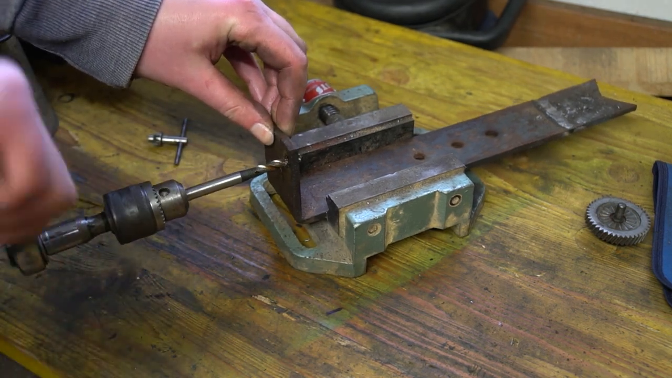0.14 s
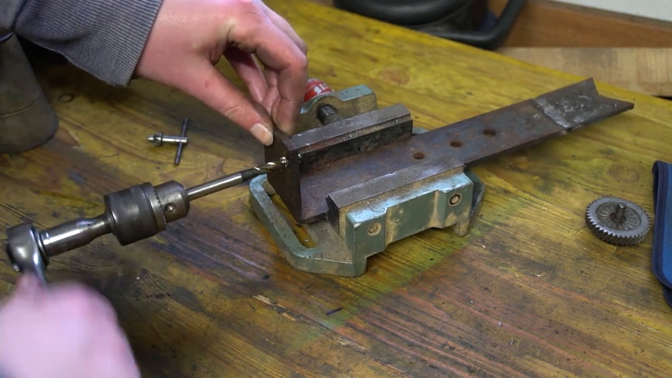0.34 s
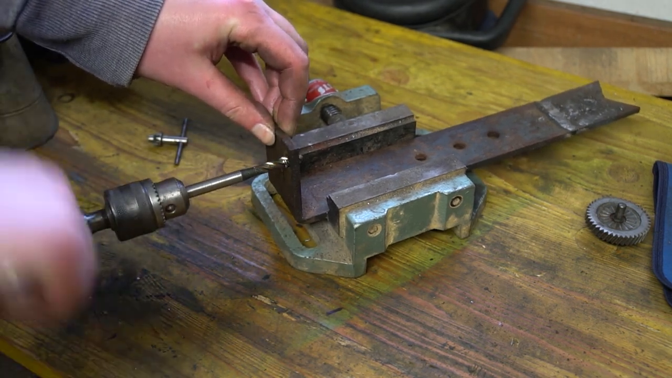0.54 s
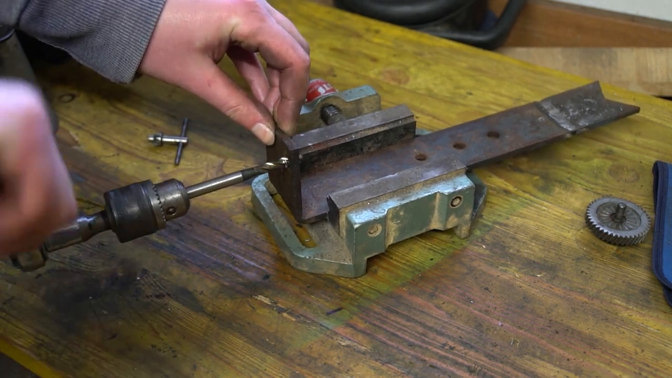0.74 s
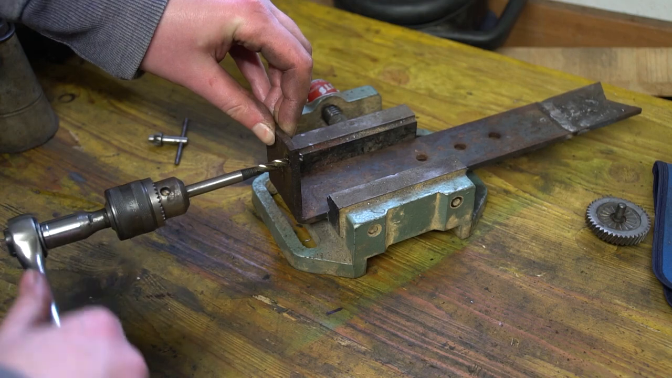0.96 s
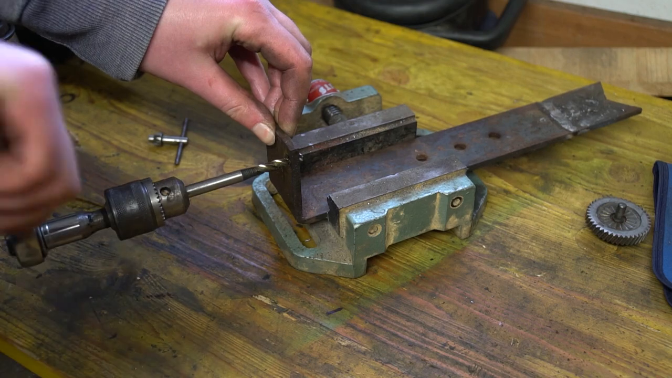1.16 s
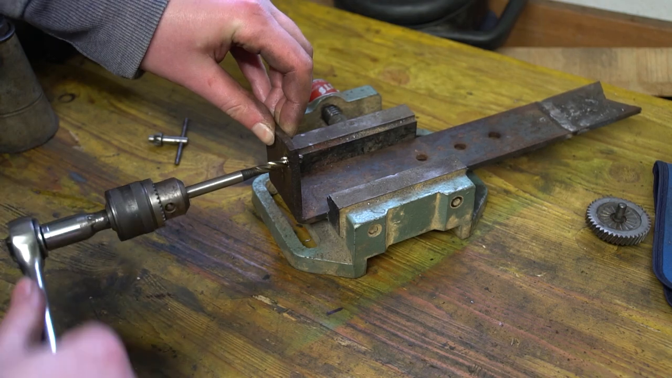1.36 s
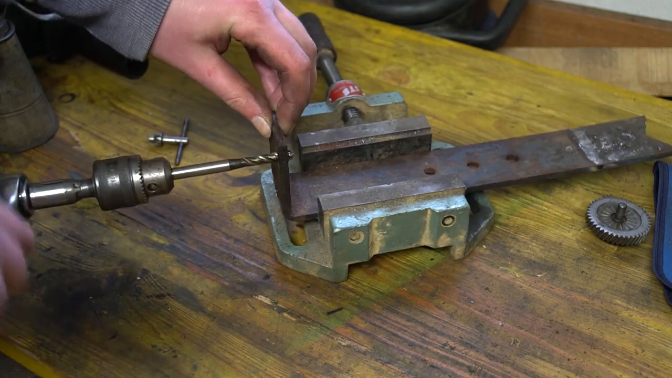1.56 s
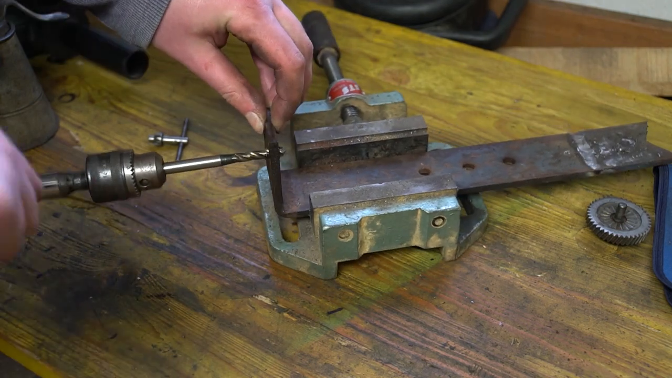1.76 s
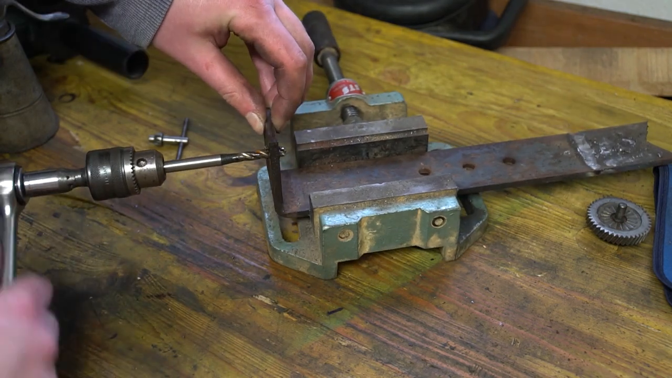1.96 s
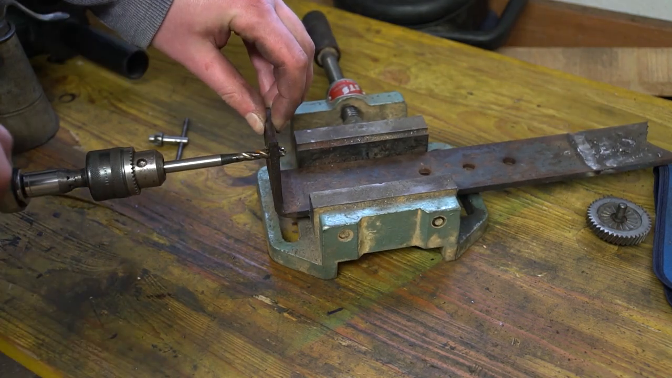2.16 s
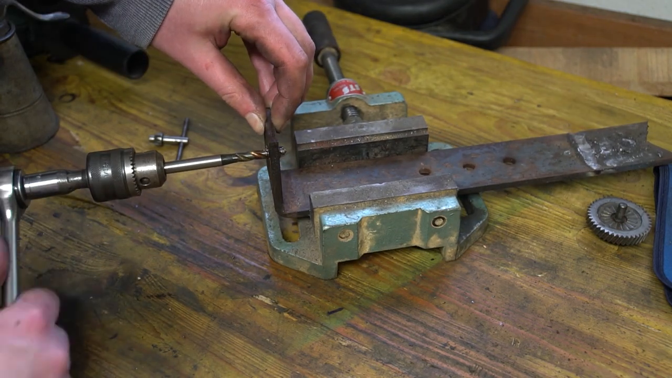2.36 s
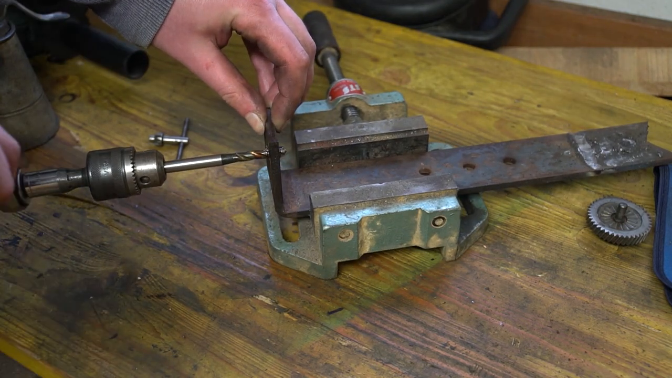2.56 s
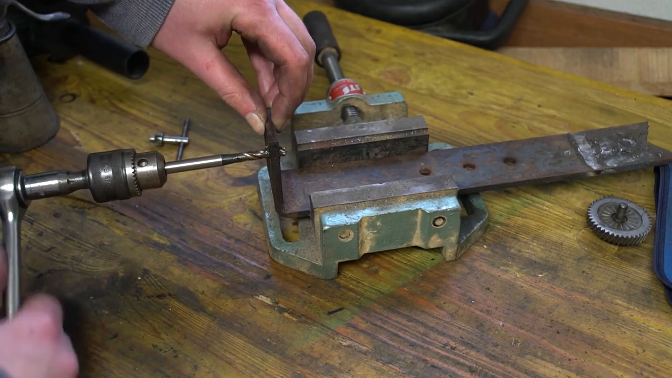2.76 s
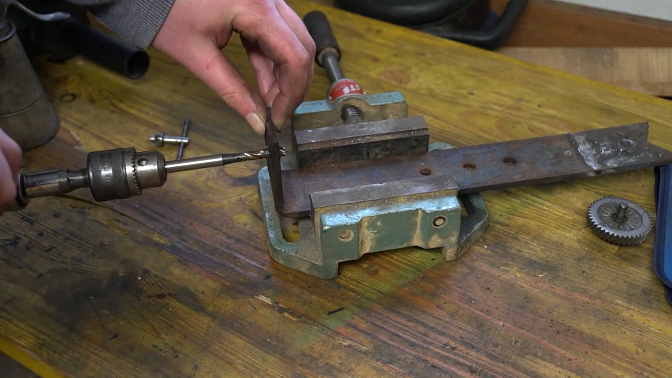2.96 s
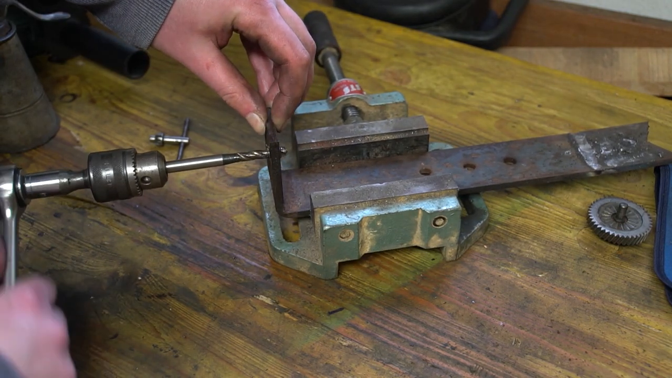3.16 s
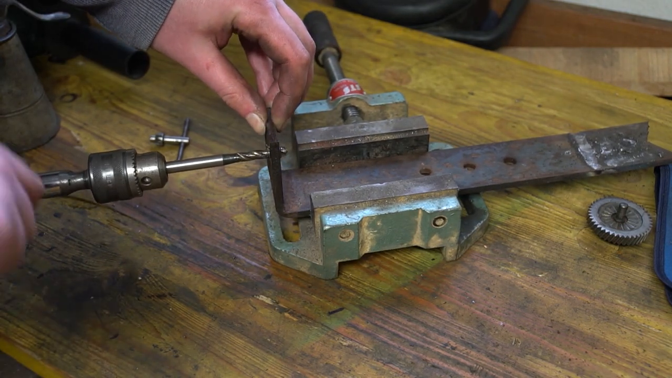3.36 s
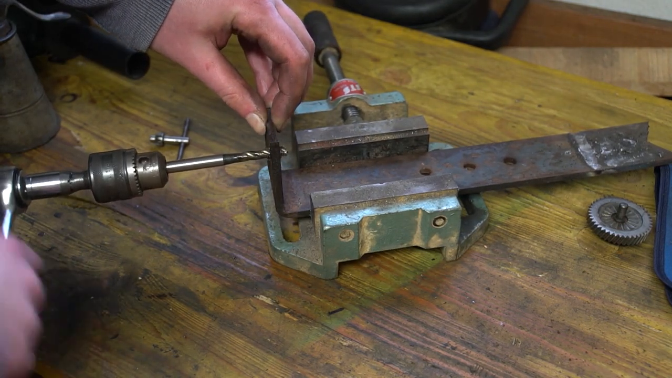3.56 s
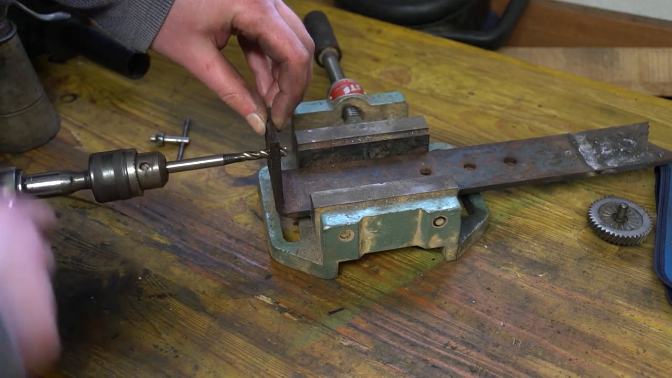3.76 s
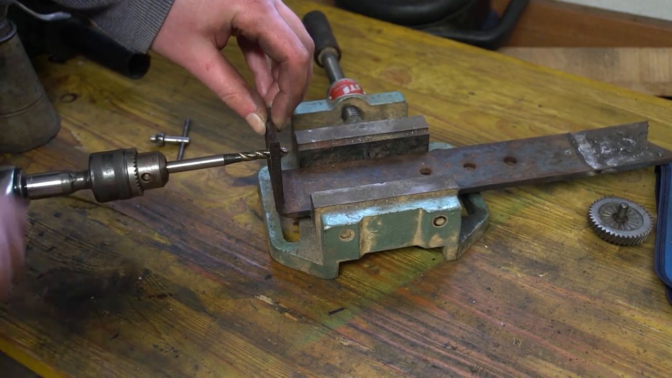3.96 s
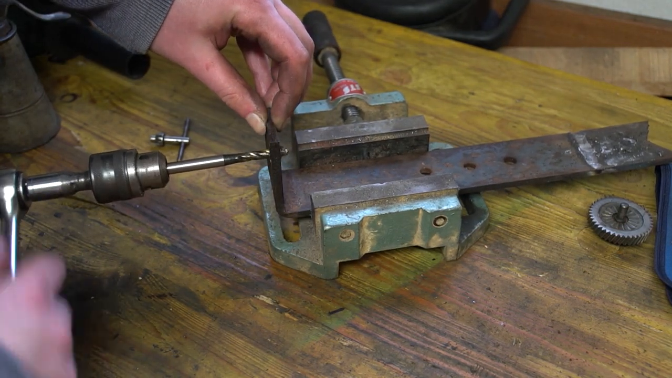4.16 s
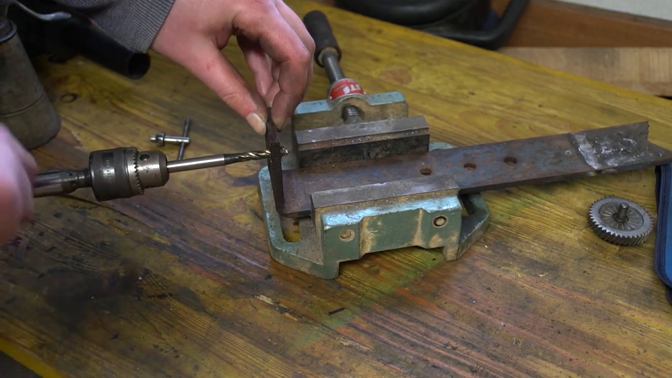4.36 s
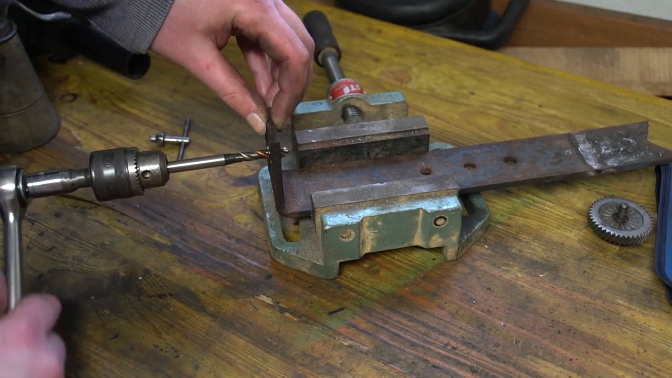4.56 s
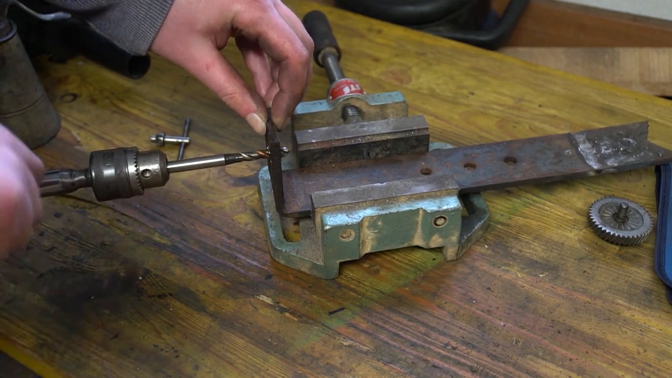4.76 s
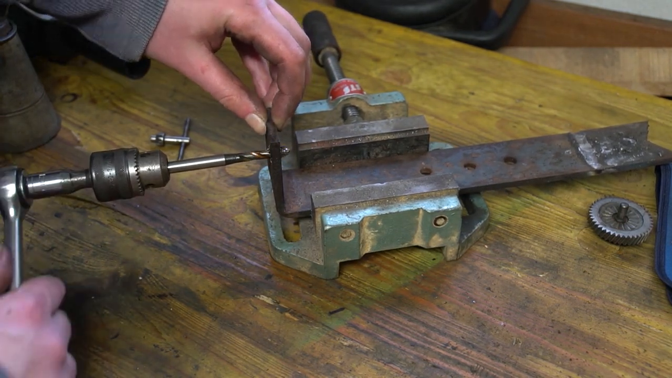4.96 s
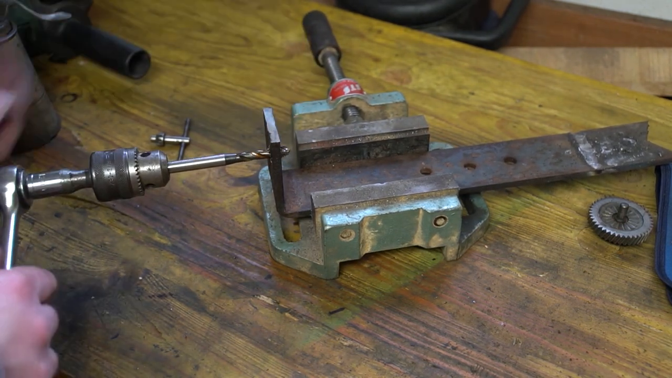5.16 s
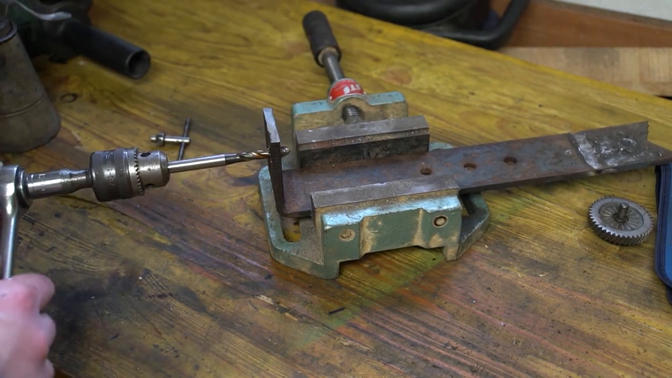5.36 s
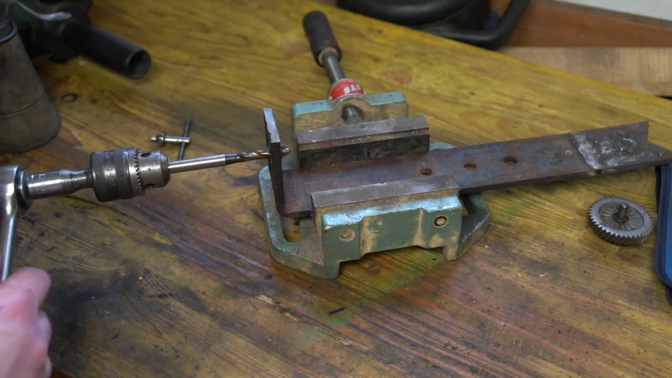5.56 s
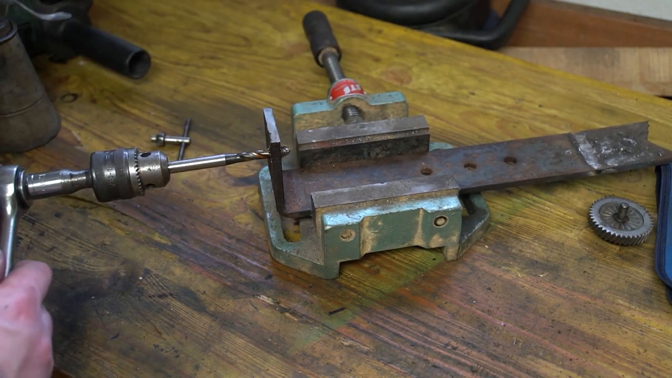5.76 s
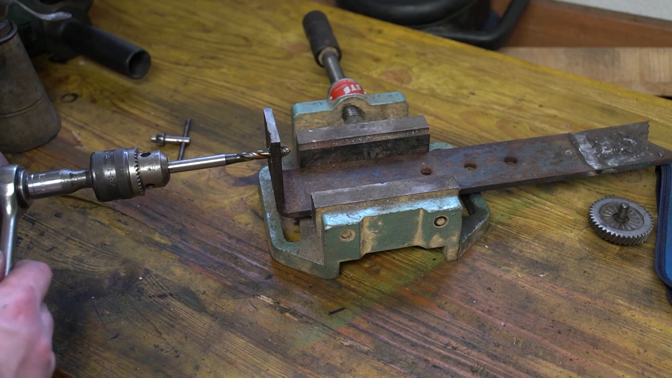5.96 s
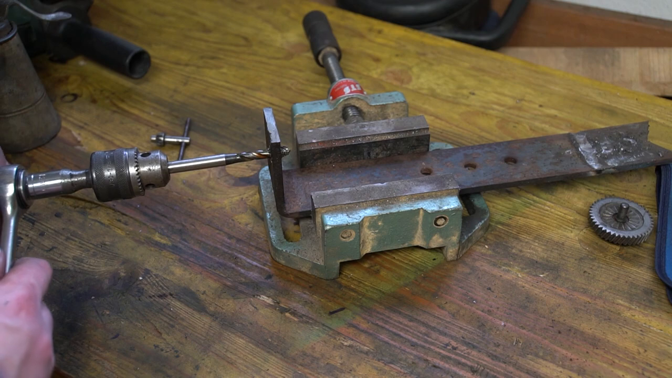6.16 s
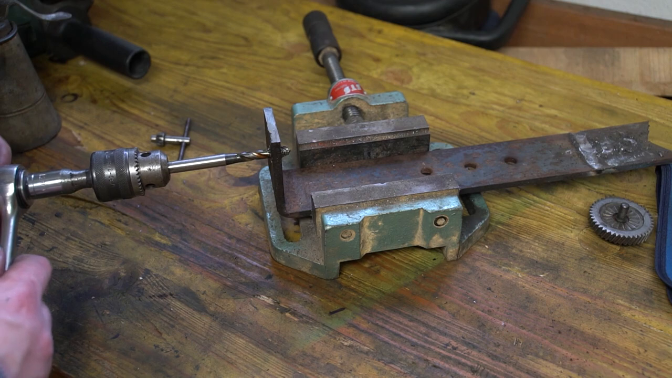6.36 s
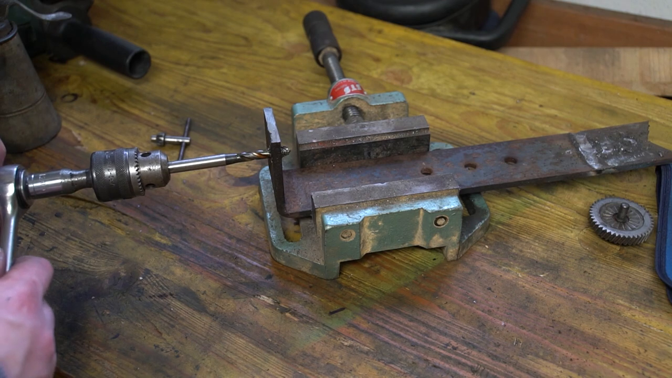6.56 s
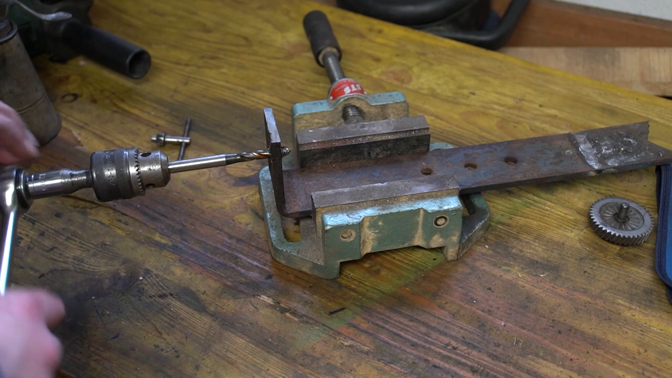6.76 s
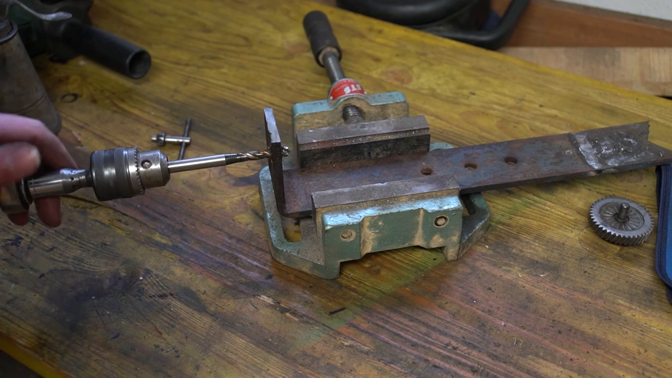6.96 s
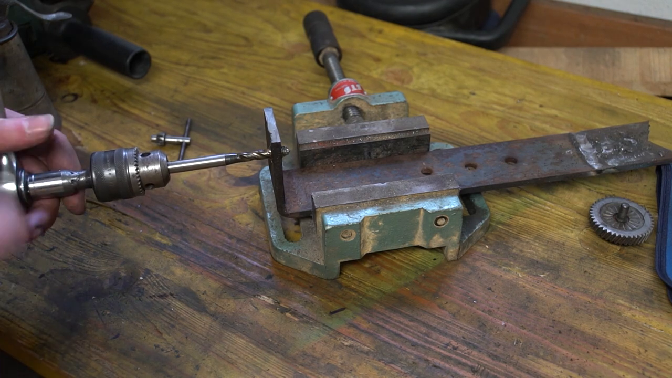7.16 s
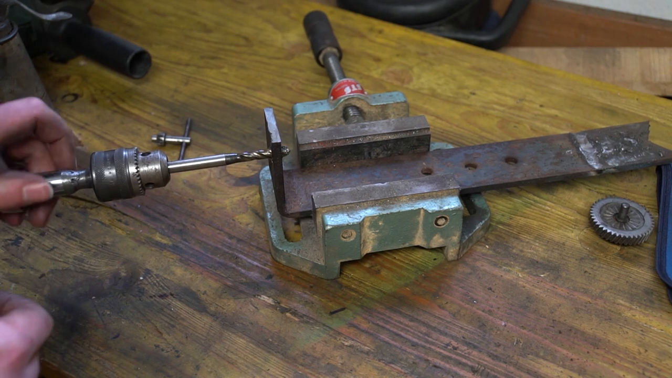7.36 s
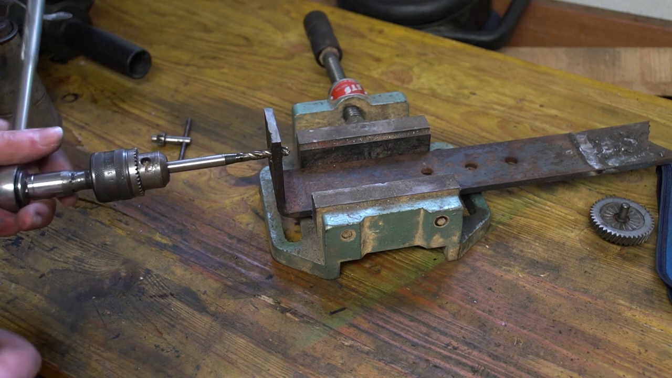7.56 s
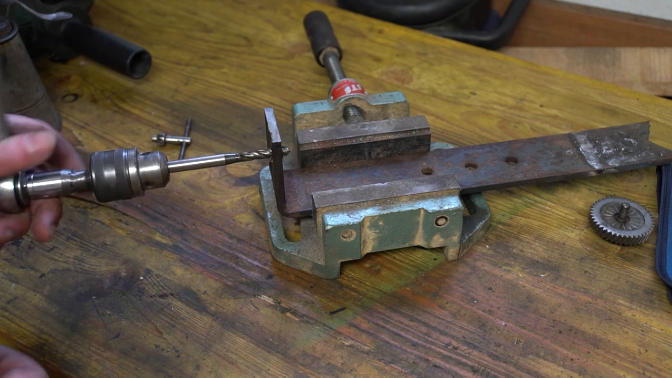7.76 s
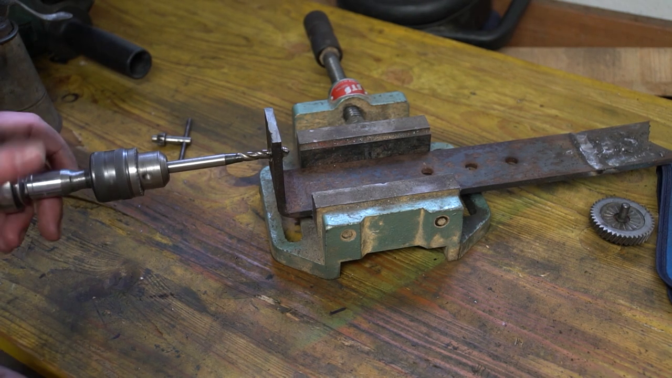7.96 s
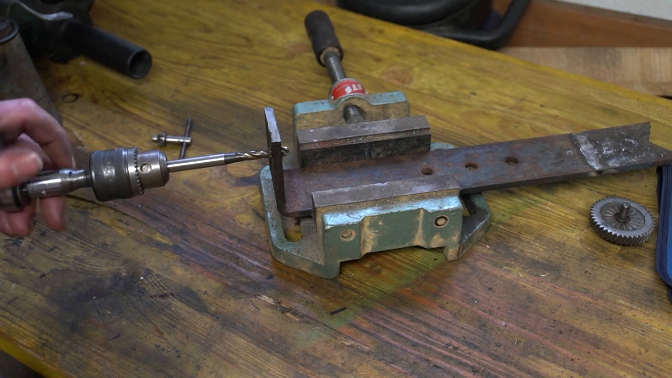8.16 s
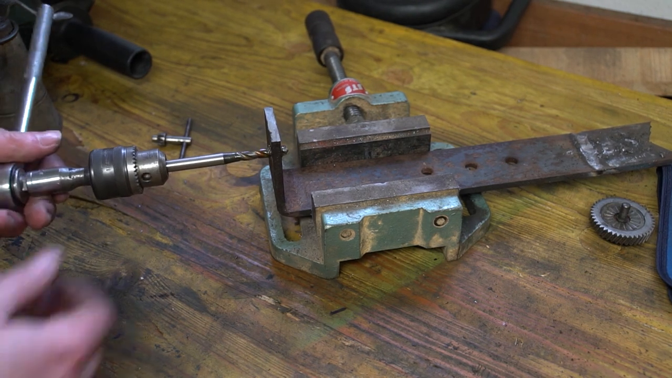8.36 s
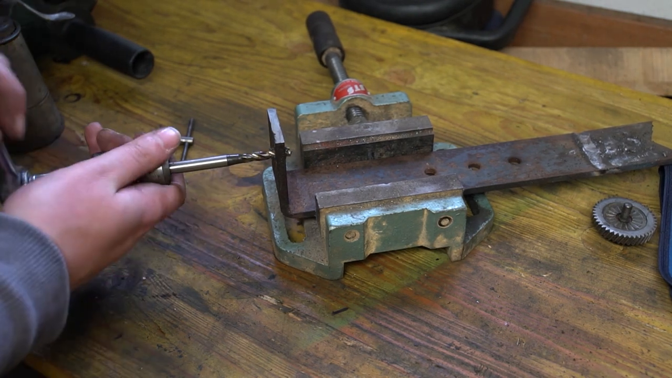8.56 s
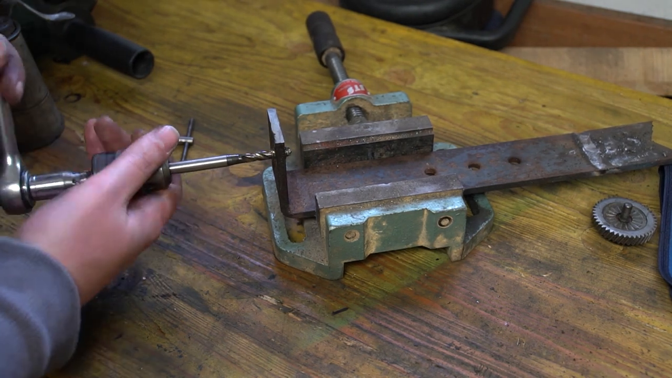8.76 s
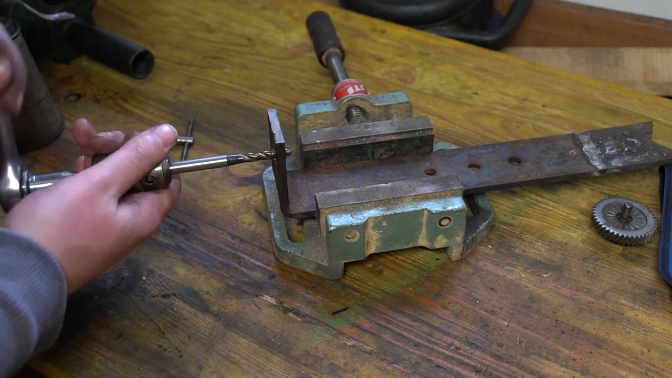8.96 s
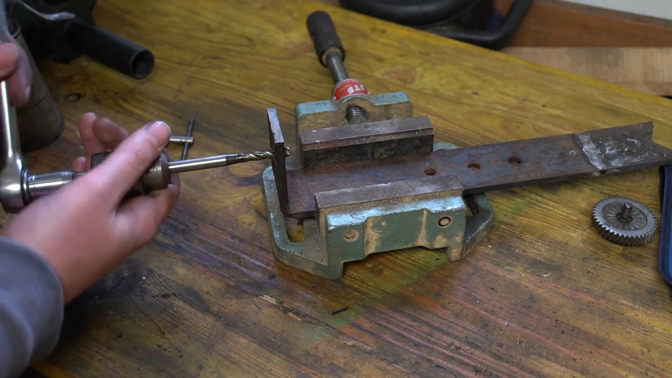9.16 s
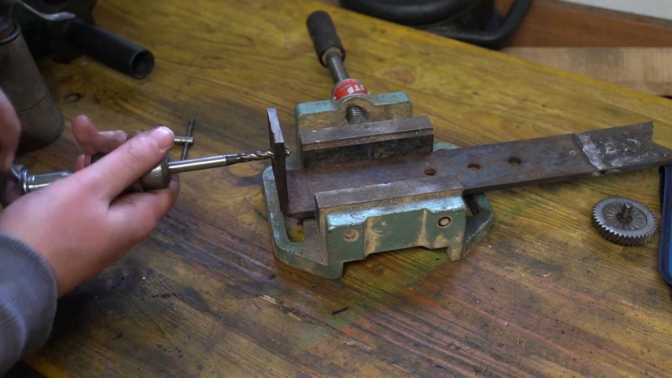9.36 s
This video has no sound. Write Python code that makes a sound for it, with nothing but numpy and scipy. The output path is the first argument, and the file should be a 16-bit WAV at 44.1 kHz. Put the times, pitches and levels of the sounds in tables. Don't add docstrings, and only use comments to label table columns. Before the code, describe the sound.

Short zipping runs of bright, high-ringing pawl clicks, starting slowly and then quickening to a steady repeat. Low rumble and dull wooden knocks accompany the handle's strokes, with soft metal scraping as the bit cuts. A pause of about two and a half seconds holds only small ticks and faint room air. Then tight ratchet runs resume, irregularly spaced. Close microphone, short room tail, quiet details lifted.

```python
import sys
import numpy as np
from scipy import signal
from scipy.fft import rfft, irfft
from scipy.io import wavfile

SR = 44100
rng = np.random.default_rng(int(sys.argv[2]) if len(sys.argv) > 2 else 0)


def store_wav(level_fs):
    pcm = np.round(np.clip(np.atleast_2d(level_fs), -1, 1) * 32767)
    wavfile.write(sys.argv[1], SR, pcm.T.astype(np.int16))


def gain_from_decibels(decibels):
    exponent = np.asarray(decibels, float) / 20
    return 10 ** exponent


N = 415422

# first drop t/s, last drop t/s, teeth,
# slow start and slow finish as shares of the cruising gap
BACK_SWINGS = [(.5687, .7072, 7, .39, 1.83), (1.0852, 1.1842, 6, .61, 1.05), (1.5917, 1.7307, 6, .1, .6),
               (2.0747, 2.2047, 7, 1.08, 1.28), (2.5327, 2.6132, 6, .05, .65), (2.9277, 3.0427, 7, .1, 1.5),
               (3.2942, 3.3777, 6, .78, 1.32), (3.6442, 3.7222, 6, .12, .96),
               (3.9877, 4.1007, 7, .15, 1.56), (4.3677, 4.4592, 6, .51, 1.81),
               (4.7042, 4.8177, 6, .53, 2.12), (7.3722, 7.4487, 5, .26, .63),
               (7.6632, 7.7607, 10, .95, .55), (7.9367, 8.0007, 6, 3.74, 4.32),
               (8.5037, 8.6112, 8, .75, .61), (9.0102, 9.0847, 7, .45, .2), (9.3212, 9.4152, 8, .13, .57)]
SPEED_UP, SLOW_DOWN = 0.5, 0.35
# t/s, level/dB against its swing
STRAY_DROPS = [
    (.013, -3),
    (0.536, -13.5),
    (1.248, -18),
    (2.5145, -9.5),
    (2.874, -7),
    (8.1757, 2),
    (8.1865, -5),
    (8.2469, 3.5),
    (9.108, -38),
    (8.622, -25),
]
# start t/s, level/dB of the 9 kHz, 12.5 kHz and 14 kHz mode groups, blow level/dB
GRIPS = [(0.007, -5, -49, 6, -8), (0.531, -6, -69, 0, -0.5), (1.08, -9, -4, -1, -6.2),
         (1.587, -12, -52, -5, 2.2), (2.07, 2, -2, -21.5, -1), (2.511, -3, 3.5, -1, -5),
         (2.869, -1, -25, 5.5, -9), (3.29, 4, -24, -8, -7.5), (3.639, 4.5, 4.5, 6, -12.5),
         (3.982, -2, 17, -10, -10), (4.363, 2, 7, -23, -3.3), (4.7, 3.5, -4, -4.5, -2),
         (7.368, 2, -10, -8, -2), (7.658, -11, -48, 12, 3.5), (7.931, -6.5, -28, -8, 5.5),
         (8.171, -8, -19, -81, 0), (8.499, 2, -25, 12.5, -7), (9.006, -3, -36, 7, 2),
         (9.316, -4, -2, 3, -1)]
GAP_DB, BLOW_SPREAD_DB, RING_SPREAD_DB = 4.0, 4.5, 6.0

HEAD_HZ = [8800, 8860, 8960, 4850, 2740, 12480, 12300, 12450, 12550, 13000, 13900, 13950, 14120, 3330]
# 0 near 9 kHz and some below, 1 near 12.5 kHz, 2 near 14 kHz and the one at 3330 Hz
HEAD_GROUP = [0, 0, 0, 0, 0, 1, 1, 1, 1, 1, 2, 2, 2, 2]
# level/dB, t60/s
HEAD_RING = [(-37, 0.033), (-29, 0.07), (-30, 0.1), (-32, 0.045), (-43, 0.044), (-6, 0.01), (-32, 0.023),
             (-43.5, 0.078), (-34, 0.047), (-31, 0.034), (-4, 0.0037), (-43, 0.045), (-41.5, 0.05),
             (-51.5, 0.022)]
SEAT_DETUNE, GRIP_DETUNE = 0.005, 0.004
# f/Hz, density/dB per Hz
SNAP_COLOUR = [(700, -15), (2000, -24.5), (4000, -19), (7500, -7.5), (10000, -13), (12800, -5),
               (14500, -13), (16000, -38)]

# t/s, peak level/dB, head ring level/dB
EARLIER_DROP = [
    (.001, -6, 2),
]
# t/s, peak level/dB,
# head ring level/dB
TICKS = [(0.102, -37, -12), (0.2065, -58, -7), (1.031, -40, 0), (1.2798, -42, -6), (1.79, -34, 3),
         (1.814, -48, -1), (1.8221, -32.5, -8), (1.9632, -29, -36), (2.033, -44.5, 16), (2.709, -41, 12),
         (2.914, -33.5, -8), (3.104, -35, -2), (3.279, -31, 4), (3.435, -32, -5), (3.618, -50, 19),
         (3.7964, -35, 5), (3.877, -51.5, -8), (3.96, -35, -17), (4.16, -31.5, -10), (4.2716, -40.5, -6),
         (4.6843, -43, -5),
         (5.11, -41.5, 7), (5.259, -45, -15), (5.3605, -40, 1), (5.675, -53, -13),
               (5.8864, -33.5, -23), (5.9259, -34.5, -21), (5.9598, -43, -15), (6.2801, -46, -21),
               (6.4328, -21, -13), (6.458, -33.5, 1), (6.851, -54, -9), (7.3282, -36, 1), (7.36, -26, -15),
               (7.5103, -27.5, 4), (7.577, -34.5, -6), (7.6339, -54, -4.0), (7.6475, -34, -8),
               (7.9076, -59, -7), (8.6855, -24.5, 8.5), (8.9934, -36, 18),
         (0.186, -61, -12),
    (1.0487, -13.5, -18),
    (1.546, -34, -14),
    (4.962, -53, -10),
    (5.604, -58, -8),
    (6.2277, -49.5, -20),
    (6.397, -52, -11),
    (9.302, -52, -9),
]
ALL_TICKS = EARLIER_DROP + TICKS

# load on t/s, load off t/s, rumble level/dB
LOADS = [(0, 0.107, -42.5), (0.5, 0.739, -42), (1.017, 1.213, -44), (1.26, 1.32, -44), (1.506, 1.66, -45),
         (1.72, 1.86, -46), (2.036, 2.282, -43), (2.495, 2.56, -47.5), (2.614, 2.719, -46.5),
         (2.897, 3.082, -42.5), (3.298, 3.393, -40), (3.655, 3.784, -42), (3.873, 4.135, -46.5),
         (4.325, 4.502, -45), (4.7, 4.83, -44), (5.115, 5.11, -56.5), (5.655, 5.72, -65),
         (6.46, 6.463, -49.5), (6.645, 6.686, -65.5), (6.823, 6.844, -52), (7.164, 7.18, -65),
         (7.38, 7.515, -40), (7.666, 7.766, -35.5), (7.93, 8.02, -40.5), (8.163, 8.302, -43),
         (8.49, 8.64, -40), (8.892, 9.137, -47), (9.319, 9.42, -51)]
SWELL_DB, RISE_DB_S, FALL_DB_S, IDLE_DB = 6.5, 227, 156.5, -73
# t/s, peak level/dB, main pitch f/Hz
KNOCKS = [(0.103, -34, 660), (0.674, -33.5, 860), (0.972, -43.5, 298), (1.047, -38, 469),
          (1.342, -37, 1070), (1.813, -37.5, 516), (1.855, -41, 1105), (1.888, -33, 1320),
          (1.963, -30.5, 465), (2.033, -34.5, 502), (2.195, -45, 950), (2.288, -37, 462),
          (2.494, -37.5, 495), (2.513, -29.5, 1470), (2.632, -35.5, 1540), (2.908, -39, 466),
          (3.264, -43, 497), (3.619, -36.5, 476), (3.903, -27.5, 521), (4.158, -37, 1450),
          (4.27, -44.5, 454), (4.34, -44, 506), (4.5, -44.5, 365), (4.616, -27, 559), (4.674, -33.5, 1080),
          (5.098, -47, 576), (6.435, -36, 1426), (6.81, -44.5, 1470), (7.002, -44.5, 620),
                (7.328, -38, 636), (7.466, -39, 970), (7.507, -38.5, 482), (7.634, -41.5, 1380),
                (7.906, -37, 536), (8.14, -51, 500), (8.271, -35.5, 580), (8.307, -39.5, 1380),
                (8.453, -56, 500), (8.861, -41.5, 640), (8.987, -40, 484), (9.311, -43.5, 506),
                (9.328, -26, 3250),
          (2.72, -41, 460), (7.195, -56, 470), (3.086, -39.5, 622), (5.257, -53.5, 480),
               (5.353, -54.5, 546), (5.604, -54, 430), (5.753, -58.5, 361), (6.839, -42.5, 461),
               (6.853, -48.5, 3330)]
# f/Hz, level/dB, t60/s
BENCH_MODES = [(128, -6, 0.23), (223.5, -4, 0.25), (375, -12.5, 0.42), (497, -0.5, 0.27), (602.5, -6, 0.41),
               (700, -8.5, 0.28), (942, -2, 0.17), (1380, -1.5, 0.17), (1484, -2.5, 0.16), (1918, -4, 0.11),
               (2710, -6.5, 0.088), (3330, -6, 0.036)]
# t/s, peak level/dB, pitch f/Hz
HEAVES = [
    (.97, -43, 100),
    (1.33, -42, 89),
    (1.54, -38, 120),
    (4.3, -50, 127),
    (6.468, -50, 50),
]

# start t/s, loudest t/s, fade/s, level/dB
DRAGS = [(0.173, 0.182, .11, -56.5), (0.425, 0.489, .05, -58), (0.88, 0.964, .01, -61),
         (1.041, 1.045, 0.026, -49), (1.39, 1.505, 0.88, -47.5), (2.04, 2.04, 0.023, -49),
         (3.266, 3.269, .2, -54.5), (3.607, 3.63, 0.013, -50), (3.863, 3.879, 0.023, -51.5),
         (4.306, 4.378, .2, -54), (6.423, 6.436, 0.086, -53.5), (6.995, 7.006, 0.12, -63),
         (7.341, 7.335, 0.027, -45.5), (7.631, 7.635, 0.032, -50), (7.907, 7.901, 0.02, -32.5),
         (8.14, 8.131, 0.042, -46), (8.444, 8.458, 0.16, -54.5), (8.765, 8.762, .12, -61),
         (8.776, 9.006, 0.031, -53), (9.304, 9.3, 0.022, -46)]
# f/Hz, density/dB per Hz
RASP_COLOUR = [(400, 6), (1400, 8), (3200, 1), (6000, -3), (10000, -9.5), (14000, -11.5), (16000, -49)]
# t/s, f/Hz, level/dB
SQUEAKS = [
    [(9.212, 14150, -78), (9.226, 15200, -73), (9.262, 15600, -69), (9.28, 14800, -86.5),
     (9.298, 13900, -91)],
    [(8.4, 10000, -80), (8.45, 8900, -74)],
]
# f/Hz, density/dB per Hz
AIR_COLOUR = [(20, 9.5), (127, -4.5), (163, -18), (222, 5.5), (459, -5), (2200, -25), (12300, -39),
              (16000, -46)]
AIR_DB = -66


def rms_one(x):
    return x / np.sqrt(np.mean(x ** 2) + 1e-20)


def coloured(x, points):
    hz = np.maximum(np.arange(len(x) // 2 + 1) * SR / len(x), 1)
    hz_at, db_at = np.transpose(points)
    weight = gain_from_decibels(np.interp(np.log(hz), np.log(hz_at), db_at))
    return rms_one(irfft(rfft(x) * weight, len(x)))


def ring(clicks, hz, t60):
    r, w = gain_from_decibels(-60 / (t60 * SR)), 2 * np.pi * hz / SR
    return signal.lfilter([0, np.sin(w)], [1, -2 * r * np.cos(w), r * r], clicks + 1e-18)


def clicks_at(times, gains):
    out = np.zeros(N)
    np.add.at(out, np.clip((np.asarray(times) * SR).astype(int), 0, N - 1), gains)
    return out


def dying(times, gains, t60, rise_s):
    r, a = gain_from_decibels(-60 / (t60 * SR)), np.exp(-1 / (rise_s * SR))
    fall = signal.lfilter([1], [1, -r], clicks_at(times, gains) + 1e-18)
    return signal.lfilter([1 - a], [1, -a], fall)


def snaps(times, db, t60, uneven_db=3.5):
    noise, out = coloured(rng.standard_normal(N), SNAP_COLOUR), 0
    uneven = uneven_db * rng.standard_normal((len(times), 3))
    first = np.clip((times[:, None] * SR).astype(int) + np.arange(50), 0, N - 1)
    for k, band in enumerate([[300, 6500], [6500, 11000], [11000, 17000]]):
        part = signal.sosfilt(signal.butter(2, band, "band", fs=SR, output="sos"), noise)
        steady = np.minimum(np.std(part) / np.std(part[first], axis=1), 2)
        out = out + part * dying(times, steady * gain_from_decibels(db + uneven[:, k]), t60, rise_s=0.00028)
    return out


def drops():
    s, db = map(list, zip(*STRAY_DROPS))
    for first, last, teeth, slow_start, slow_finish in BACK_SWINGS:
        k = np.arange(teeth - 1)
        gaps = 1 + slow_start * SPEED_UP ** k + slow_finish * SLOW_DOWN ** k[::-1]
        travelled = np.append(0, np.cumsum(gaps)) / gaps.sum()
        s += list(first + (last - first) * travelled)
        db += list(GAP_DB * np.log2(np.append(gaps[0], gaps) / gaps.mean()))
    return np.array(s), np.array(db)


def head(s, db, spread_db):
    luck, seat = rng.standard_normal(db.shape), rng.standard_normal((len(s), len(HEAD_HZ) + 1))
    graze = rng.uniform(-0.92, 1, db.shape)
    level_db, t60 = np.transpose(HEAD_RING)
    detune = 1 + SEAT_DETUNE * seat[:, 1:] + GRIP_DETUNE * seat[:, :1]
    w = 2 * np.pi * np.array(HEAD_HZ) * detune
    double_blow = 1 + 0.5 * np.exp(-1j * w * 0.000602 * graze)
    strength = gain_from_decibels(db + level_db + spread_db * luck * np.clip(t60 / 0.069, 0, 1)) * double_blow
    t = np.arange(SR // 8) / SR
    fall = np.exp(-np.log(1000) * t / t60[:, None])
    out = np.zeros(N + len(t))
    for start, gain, turn in zip((s * SR).astype(int), strength, w):
        modes = fall * np.sin(turn[:, None] * t + np.angle(gain)[:, None])
        out[start:start + len(t)] += np.abs(gain) @ modes
    return out[:N]


def ratchet():
    s, blow_db = drops()
    luck = rng.standard_normal((len(s), 4))
    grips = np.array(GRIPS)
    swing = grips[np.maximum(np.searchsorted(grips[:, 0], s) - 1, 0)]
    blow_db = blow_db + swing[:, 4] + BLOW_SPREAD_DB * luck[:, 2]
    out = snaps(s - 0.0004, blow_db - 9.5, t60=0.0059)
    rebound_s = s + 0.0022 + 0.0006 * luck[:, 0]
    out += snaps(rebound_s, blow_db - 18 + 3.0 * luck[:, 1], t60=0.01)
    grip_db = swing[:, 1:4]
    grip_db[:, 1:] += RING_SPREAD_DB * luck[:, 3:] * [1, -1]
    group, lasting = np.array(HEAD_GROUP), np.array(HEAD_RING)[:, 1] > 0.02
    pawl_db = blow_db[:, None] + grip_db[:, group] * np.where(lasting, 1, 0.25)
    tick_s, tick_db, ring_db = np.transpose(ALL_TICKS)
    weak_db = tick_db[:, None] + ring_db[:, None] * lasting + np.array([4.0, -8.0, -8.0])[group]
    return out + head(np.append(s, tick_s), np.vstack([pawl_db, weak_db]), spread_db=3.0)


def ticks():
    s, db, _ = np.transpose(ALL_TICKS)
    return signal.lfilter([1], [1, -0.25], snaps(s - 0.0003, db + 1.0, t60=0.011, uneven_db=3.0))


def load():
    t = np.arange(0, N + 100, 100) / SR
    each = []
    for on, off, db in LOADS:
        start_db = db - SWELL_DB
        levels = [start_db - RISE_DB_S, start_db, db, db - FALL_DB_S]
        each.append(np.interp(t, [on - 1, on, off, off + 1], levels))
    return np.interp(np.arange(N) / SR, t, np.maximum(np.max(each, axis=0), IDLE_DB))


def thumps(s, db, pitch_hz, cycles):
    t = np.arange(SR // 5) / SR
    out = np.zeros(N + len(t))
    for start, gain, hz in zip(s, gain_from_decibels(db), pitch_hz):
        turns = t * hz / cycles
        swell = np.e * turns * np.exp(-turns)
        out[int(start * SR):][:len(t)] += gain * swell * np.sin(2 * np.pi * hz * t)
    return out[:N]


def bench(rumble_db):
    s, db, pitch_hz = np.transpose(KNOCKS)
    luck = rng.standard_normal((len(s), len(BENCH_MODES)))
    grit = gain_from_decibels(4.43 * np.minimum(rng.exponential(1, N), 4)) * rng.choice([-1, 1], N)
    born = rng.random(N) < 2500 / SR
    dealt = rng.integers(0, len(BENCH_MODES), N)
    chips = grit * born * gain_from_decibels(rumble_db)
    knocks, chatter = 0, 0
    for k, (hz, level_db, t60) in enumerate(BENCH_MODES):
        near_db = -9.0 * np.abs(np.log2(hz / pitch_hz))
        blow_db = db + level_db + near_db - 7 + 3.0 * luck[:, k]
        knocks = knocks + ring(clicks_at(s, gain_from_decibels(blow_db)), hz, t60)
        chatter = chatter + gain_from_decibels(level_db) * ring(chips * (dealt == k), hz, 0.32 * t60)
    soft = signal.lfilter([0.45], [1, -0.55], knocks) + thumps(s, db - 1, pitch_hz, cycles=3.0)
    wood_colour = [(100, -8), (400, 16.5), (1500, 4), (3300, -18.5), (12000, -15.5)]
    wood = coloured(rng.standard_normal(N), wood_colour)
    crack = signal.lfilter(*signal.butter(1, [900, 2800], "band", fs=SR), wood)
    soft = soft + crack * dying(s, gain_from_decibels(db + 4.5), t60=0.014, rise_s=0.00041)
    wood_level = dying(s, gain_from_decibels(db - 9.0), t60=0.08, rise_s=0.0021) + gain_from_decibels(rumble_db - 6.5)
    return soft + gain_from_decibels(-11.5) * chatter + wood * wood_level


def sway():
    bass = [(15, -10.0), (40, -0.5), (70, -18.0), (125, -3.0), (200, -28.5), (400, -36)]
    low = coloured(rng.standard_normal(N), bass)
    lumps = signal.sosfilt(signal.butter(2, 5.0, fs=SR, output="sos"), rng.standard_normal(N))
    return low * gain_from_decibels(1.8 * rms_one(lumps))


def rasp():
    grains = rng.standard_normal(N) * gain_from_decibels(4.3 * np.minimum(rng.exponential(1, N), 5))
    t = np.arange(N) / SR
    swell = 0
    for start, top, fade, db in DRAGS:
        swell = swell + gain_from_decibels(db + 6.5) * np.interp(t, [start, top, top + fade], [0, 1, 0]) ** 2.3
    return swell * coloured(grains, RASP_COLOUR)


def squeaks():
    out, t = np.zeros(N), np.arange(N) / SR
    for rows in SQUEAKS:
        s, hz, db = np.transpose(rows)
        level = gain_from_decibels(np.interp(t, s, db)) * (t > s[0]) * (t < s[-1])
        phase = 2 * np.pi * np.cumsum(np.interp(t, s, hz)) / SR
        out += np.sqrt(2) * level * np.sin(phase)
    return out


def workshop(x, t60=0.19, gap_s=0.00093):
    t = np.arange(SR // 2) / SR
    tail = rng.standard_normal(len(t)) * gain_from_decibels(-60 * t / t60) * (1 - np.exp(-(t / gap_s) ** 2))
    return signal.oaconvolve(x, tail / np.sqrt(np.sum(tail ** 2)))[:N]


def scene():
    rumble_db = load()
    metal = ratchet() + ticks() + rasp()
    wood = bench(rumble_db)
    room = workshop(gain_from_decibels(-10) * metal + gain_from_decibels(-9) * wood)
    sways = gain_from_decibels(0.37 * rumble_db - 40.5) * sway() + thumps(*np.transpose(HEAVES), cycles=1.4)
    air = gain_from_decibels(AIR_DB) * coloured(rng.standard_normal(N), AIR_COLOUR)
    return (metal + wood + room + squeaks() + sways + air)[None]


def limiter(x, ceiling_db=-16.5, release_db_s=560.0, attack_s=0.00016):
    climb = release_db_s * np.arange(N) / SR
    over = np.maximum(20 * np.log10(np.abs(x) + 1e-9) - ceiling_db, 0)
    cut = np.maximum.accumulate(over + climb) - climb
    ahead = 40
    a = np.exp(-1 / (attack_s * SR))
    cut = signal.lfilter([1 - a], [1, -a], np.append(cut[ahead:], np.full(ahead, cut[-1])))
    return x * gain_from_decibels(-cut)


def low_pass(x):
    return signal.sosfilt(signal.butter(12, 17000, fs=SR, output="sos"), x)


def record(dry):
    top_cut = signal.cheby2(16, 44, 15950, fs=SR, output="sos")
    mix = signal.sosfilt(top_cut, limiter(dry[0]))[None]
    return low_pass(mix)


dry = scene()
out = record(dry)
store_wav(out)
```